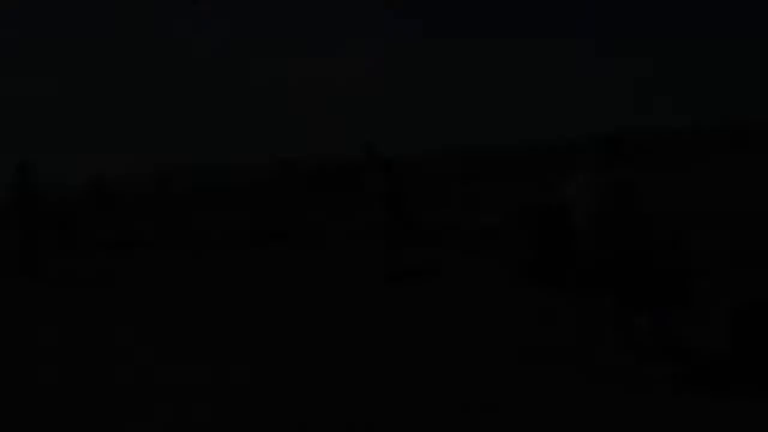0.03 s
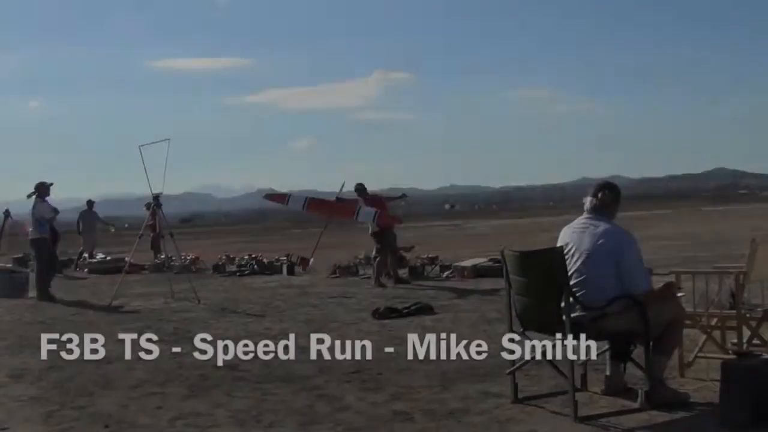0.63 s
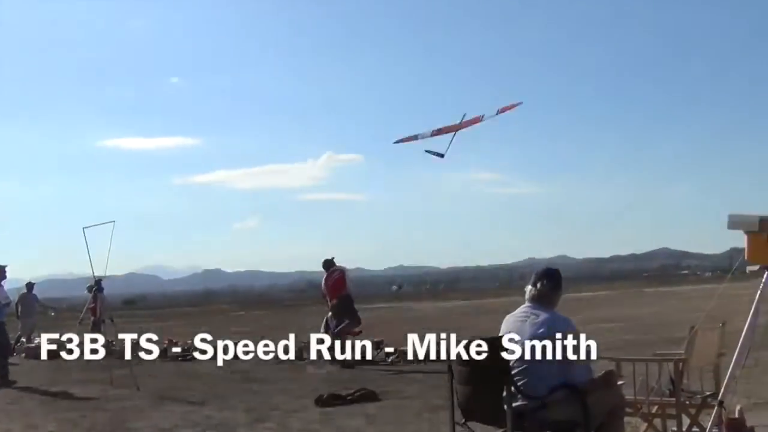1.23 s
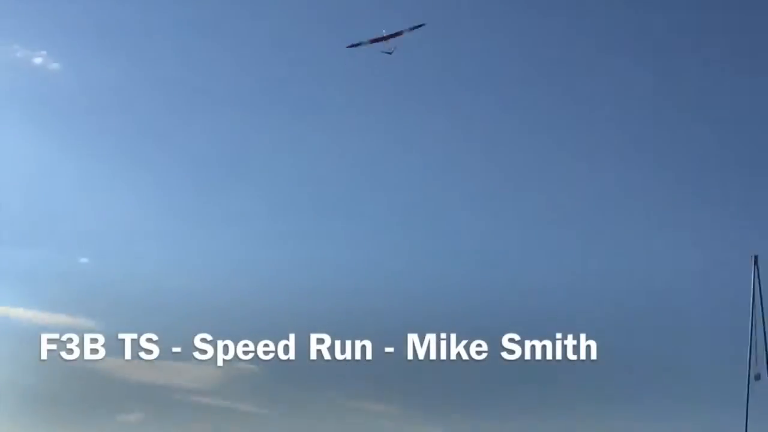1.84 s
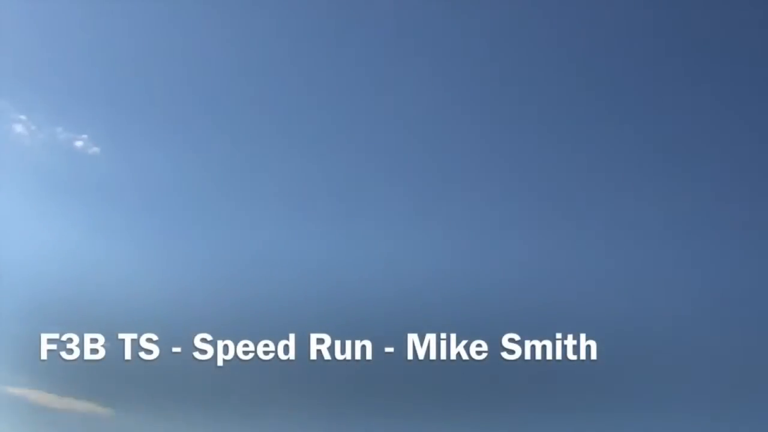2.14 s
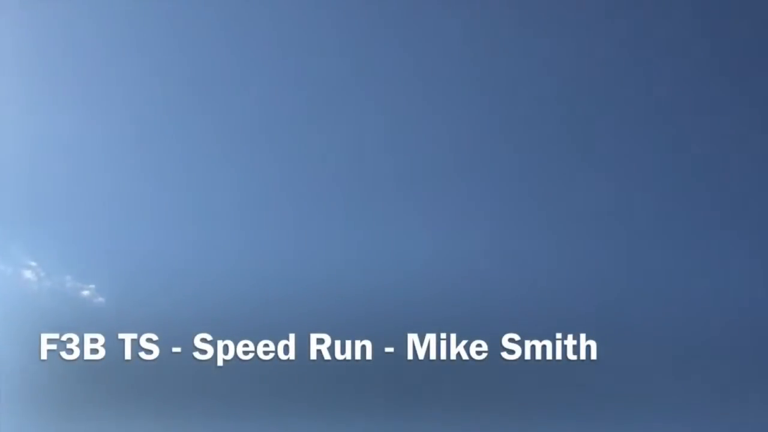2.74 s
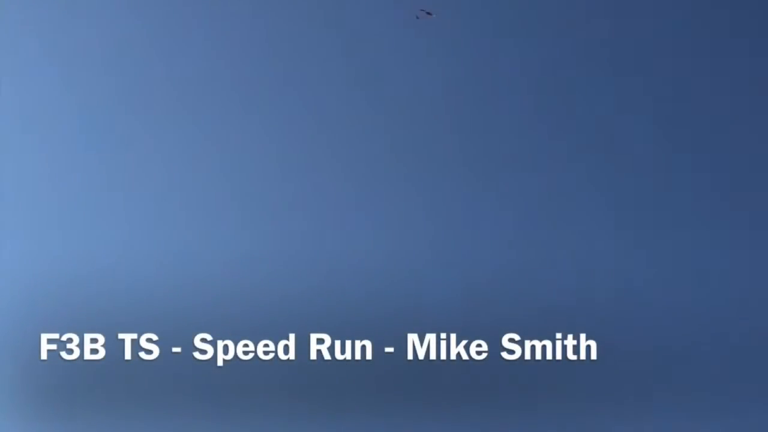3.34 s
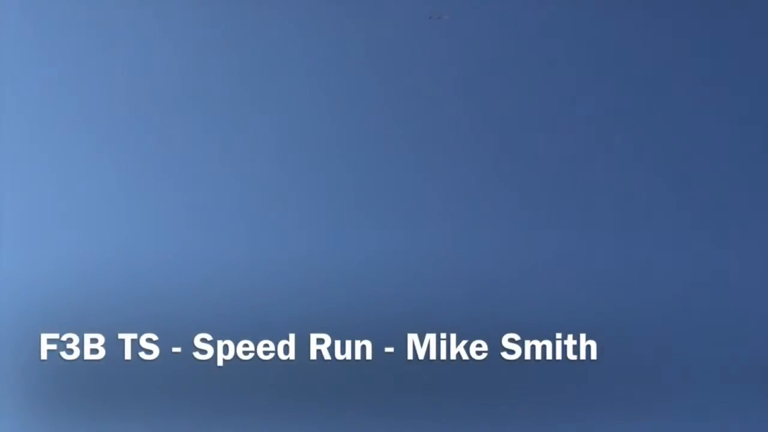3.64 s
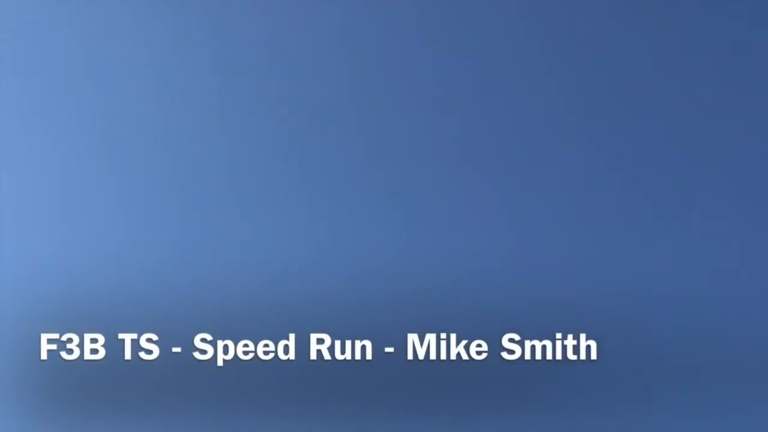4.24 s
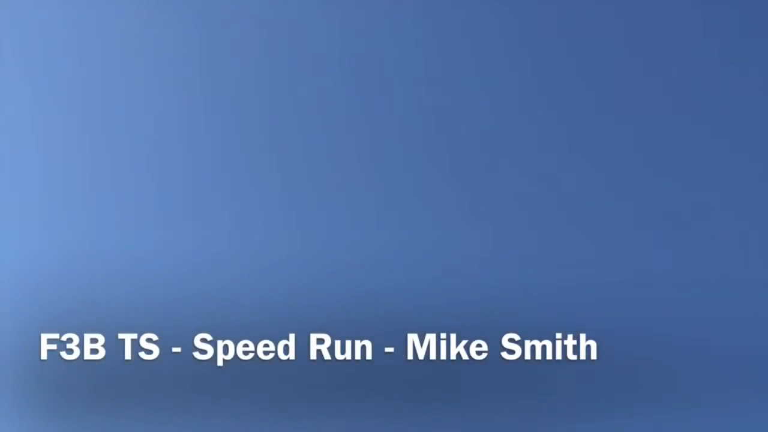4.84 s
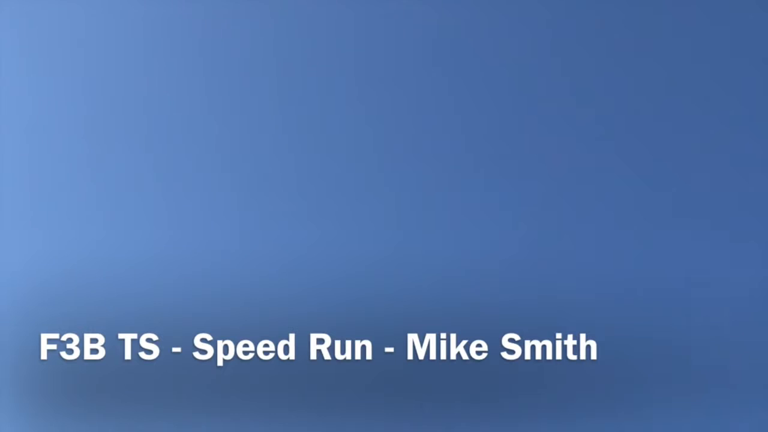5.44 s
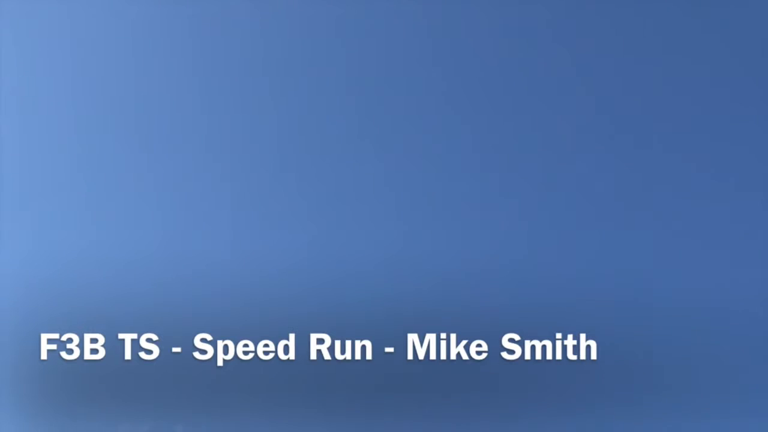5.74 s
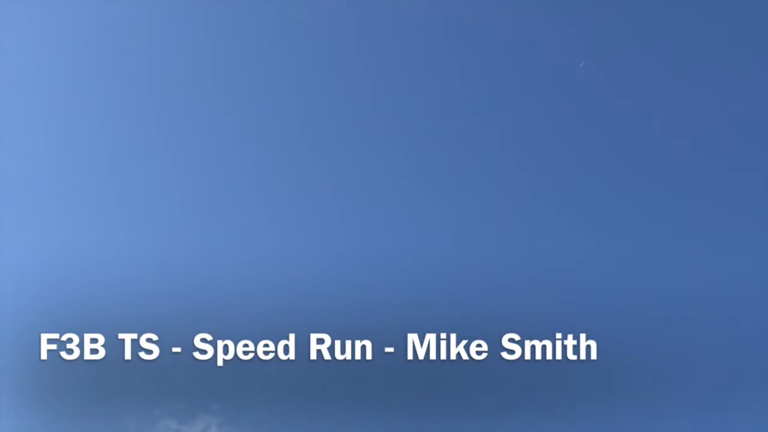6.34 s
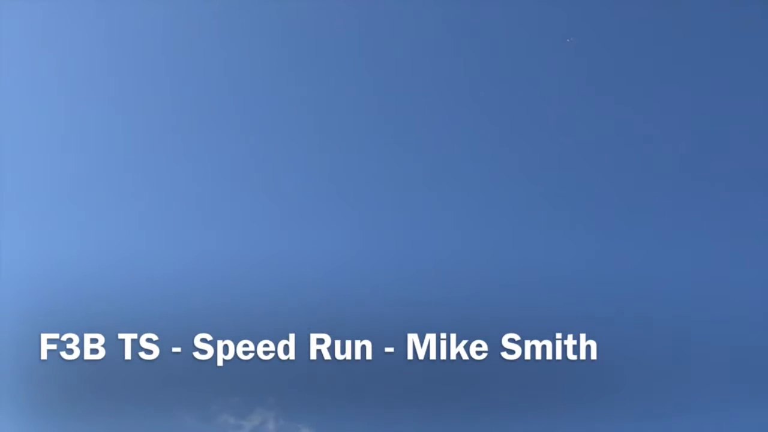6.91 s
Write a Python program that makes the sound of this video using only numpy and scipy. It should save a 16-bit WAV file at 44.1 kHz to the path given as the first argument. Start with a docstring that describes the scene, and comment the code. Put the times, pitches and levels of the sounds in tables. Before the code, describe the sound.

In an open field, a fast model glider approaches from the right with a breathy whistle and a swelling rush of air. It passes close to the microphone with a loud whoosh, the whistle dropping in pitch and vanishing. A rumbling wake and an airy hiss trail away to the left, fading slowly. A light wind rumbles softly on the microphone underneath.

```python
"""Fly-by of a model glider

A fast model glider dives from right to left past an ear-like pair of microphones in an open field.
Breathy edge tones lead it and fall in pitch by the Doppler effect. Turbulence makes the rush of the
wings and the rumble of the wake, which lingers long after the pass. Reflections comb the sound;
a light wind and a faint hiss lie underneath."""
import sys
import numpy as np
from scipy import signal
from scipy.io import wavfile
from scipy.ndimage import map_coordinates

SR = 44100
rng = np.random.default_rng(int(sys.argv[2]) if len(sys.argv) > 2 else 0)


def waveform_to_disk(signal):
    """Save audio, clipped to [-1, 1], as 16-bit WAV at the path in sys.argv[1]."""
    frames = np.transpose(np.atleast_2d(signal))
    scaled = np.clip(frames, -1, 1) * 32767
    samples = np.round(scaled).astype(np.int16)
    wavfile.write(sys.argv[1], SR, samples)


N = 316197
TIME = np.arange(N) / SR
FRAME, HOP = 1024, 256  # samples


def glider(hz, t, base_lags_ms=(.66, .75), shadow_powers=(2.2, 1.1), scatter_hz=3000, close_hz=2200):
    """Binaural hearing: sound reaches the far microphone later, shadowed and partly scattered."""
    # Surges and lulls of the glider's sound. Each row: centre time and length in seconds, gain in dB,
    # centre frequency in Hz, width in octaves, glide in octaves per second.
    flares = [(1.04, 0.082, 7, 4150, 0.5, 0.53), (1.208, 0.059, 7.5, 4630, 0.56, 0.23),
              (1.284, 0.15, 4.5, 1330, .2, 0.0056), (1.551, 0.01, 14, 4170, 0.46, 0),
              (1.619, 0.0086, 14.5, 5000, 0.69, 0.32), (1.695, 0.0179, 8, 8000, 0.64, 0.37),
              (1.725, 0.06, -3.5, 3005, .45, 0.11), (1.798, .012, 6.5, 5155, 0.34, 0),
              (1.865, 0.032, 9, 290, 0.59, 0.11), (1.904, .025, 3.5, 1662, 0.44, 0.25),
              (1.97, 0.11, 5, 9840, 0.35, 0.12), (2.01, .07, 5.5, 769, 0.36, 0),
              (2.03, 0.12, -4, 3600, 0.37, 1), (2.17, 0.045, 3.5, 320, 0.42, 0),
              (2.35, .08, -8.5, 641, .3, 0), (2.5, 0.11, -4, 8900, 0.33, 0),
              (2.667, .04, 3.5, 4000, 1.9, 0), (2.953, 0.09, 4.5, 4830, 1.9, 0.094),
              (3.6, 0.46, 4.5, 4720, 0.78, 0.069), (4.427, 0.21, 6, 3194, 0.42, 0.27),
              (5.649, 0.45, 7, 1267, 0.17, 0)]
    # Acoustic shadow on the far side. Each row: frequency in Hz, left and right gain in dB.
    shadow = [(60.9, 3, -2), (211.9, -2, -1), (315.5, 6, 1), (353, 1, -4), (458.5, -2, -4.5),
              (570, -3.5, -7.5), (669, -9.5, -1.5), (800, -10.5, -2.5), (1154, -3.5, -5.5),
              (1500, -18, -9.5), (1903, -11, -10.5), (2290, -11.5, -16.5), (3500, -13.5, -20),
              (5500, -10.5, -11.5), (10076, -17, -20), (14800, -10.5, -27)]
    # Brief brightness on the right as the glider leaves. The columns are those of flares.
    right_lift = [(2.3, .3, 7, 3107, .7, .2)]
    bearing = flight_path(t)[0]
    flare = undb(surges(flares, hz, t))
    rush = air_rush(hz, t) * flare * ground_comb(hz, t)
    direct = rush * noise() + flare * edge_tones()
    scattered = .75 * hz ** 3 / (hz ** 3 + scatter_hz ** 3)
    # close by, the wing spans a wide angle, so the two sides hear different treble noise
    spread = .95 * (1 - bearing ** 2) * hz ** 3 / (hz ** 3 + close_hz ** 3)
    # long waves take a wider way round to the far side
    detour = 1 + .2 / (1 + (hz / 250) ** 2)
    ears = []
    sides = zip((-1, 1), base_lags_ms, spectrum(shadow, hz), shadow_powers, near_comb(hz, t))
    for side, lag_ms, shadow_db, power, comb in sides:  # left, then right
        away = np.maximum(side * bearing, 0)
        incoherent = np.clip(np.maximum(scattered * away, spread * (side < 0)), 0, 1)
        heard = np.sqrt(1 - incoherent) * direct + np.sqrt(incoherent) * rush * noise()
        shade = undb(away ** power * shadow_db)
        ears.append(heard * comb * shade * delay(hz, away * lag_ms * detour))
    left, right = ears
    return join(np.array([left, right * undb(surges(right_lift, hz, t))]))


def air_rush(hz, t, crossover_hz=527, flutter_db=1, twinkle_db=2.5):
    """Turbulence noise, as a gain: large wake eddies make the bass, the thin boundary layer the treble."""
    # Spectra radiated forward and backward. Each row: frequency in Hz before the Doppler shift, gain in dB.
    ahead = [(30, -8), (120, 3.5), (245, -3), (340, -11.5), (500, -6.5), (700, -5), (950, -1.5), (1300, -1),
             (1680, -7), (2200, -5.5), (2600, -6.5), (3000, -5.5), (3330, -1.5), (3800, -12.5), (4500, -11),
             (5500, -17.5), (7700, -16), (8800, -22.5), (11000, -30.5)]
    behind = [(35, -22.5), (110, 3), (250, 0), (400, -4), (650, -2), (860, -5.5), (1080, -1), (1350, -4),
              (1600, 0), (1880, -2), (2300, -1.5), (2950, -5.5), (3900, -4), (5200, -7.5), (6700, -9.5),
              (7800, -15), (12500, -11.5), (20000, -11)]
    bearing, doppler, _ = flight_path(t)
    wake_share = 1 / (1 + (hz / crossover_hz) ** 2.7)
    db = wake_share * wake_level(t) + (1 - wake_share) * wing_level(t) - air_absorption(hz, t)
    # the forward beam gives way to the broad roar as the nose goes by
    passed = .5 + .5 * np.tanh((bearing + .1) / .39)
    db += (1 - passed) * spectrum(ahead, hz / doppler)[0] + passed * spectrum(behind, hz / doppler)[0]
    # the flow flutters, and moving air on the way makes the upper bands twinkle
    flutter = flutter_db * wander(28.39, t)
    twinkle = twinkle_db * eddies(hz, t, rate=12, per_octave=1.8)
    return undb(db + (1 - wake_share) * (flutter + twinkle))


def wing_level(t, near_db=-52):
    """Boundary-layer noise in dB: it falls with distance, faster ahead than behind, and swells and dips."""
    # Swells and dips. Each row: centre time and length in seconds, gain in dB.
    swells = [(0.876, 0.16, 4), (1.503, 0.055, -5), (1.593, 0.2, 6), (1.857, 0.027, -5), (2.059, 0.11, 5),
              (2.424, 0.15, 3.5), (3.413, 0.18, 5.5), (4.057, 0.17, 3.5), (4.495, 0.35, 6.5),
              (5.496, 0.52, 8), (6.689, 0.53, 8)]
    bearing, _, distance = flight_path(t)
    db_per_decade = np.where(bearing < 0, 63.5, 50)
    swell_db = sum(db * np.exp(-((t - s) / length) ** 2) for s, length, db in swells)
    return near_db - db_per_decade * decades(distance, near=1.68) + swell_db


def wake_level(t, peak_s=2.08, peak_db=-39.5, rise_db_per_s=29.5, linger_s=1.537, db_per_decade=44.5):
    """Wake turbulence in dB: it builds until just after the pass, then decays by a power law."""
    age = t - peak_s
    decay_db = db_per_decade * np.log10(1 + np.maximum(age, 0) / linger_s)
    return peak_db + rise_db_per_s * np.minimum(age, 0) - decay_db


def edge_tones(off_beam_db_per_degree=1.4):
    """Edge tones from gaps in the airframe fall by the Doppler effect and fade as their beams turn away."""
    # Each row: frequency in Hz before the Doppler shift, width in Hz, steady share of the power.
    # The wide rows are the airy hiss around a tone.
    tones = [(1393, 110, .35), (1400, 700, 0), (3337, 100, .5), (3330, 700, 0), (4520, 200, .25),
             (7725, 150, .3)]
    # One forward beam for each tone. Each row: level in dB, beam edge in degrees past abeam,
    # fall in dB per tenfold distance.
    beams = [(-18.5, 26, 98), (-24.5, 12, 115), (-19.5, -38, 122), (-27.5, -60, 80), (-31, -33, 82),
             (-18.5, -39, 100)]
    t = TIME[flight_path(TIME)[0] < .93]
    bearing, doppler, distance = flight_path(t)
    degrees = np.degrees(np.arcsin(bearing))
    whistle = 0
    for (hz, width, steady), (db, edge, fall_db) in zip(tones, beams):
        off_beam_db = off_beam_db_per_degree * np.maximum(degrees - edge, 0)
        gain = undb(db - fall_db * decades(distance, near=1.32) - off_beam_db)
        # turbulence shakes each tone in strength and phase
        shake = np.sqrt(2 * steady) + np.sqrt(1 - steady) * (wander(width, t) + 1j * wander(width, t))
        phase = 2 * np.pi * np.cumsum(hz * doppler) / SR
        whistle += gain * np.real(shake * np.exp(1j * phase))
    return split(np.pad(whistle, (0, N - len(t))))[2]


def flight_path(t, pass_s=1.879, crossing_s=.194, mach=.296):
    """Retarded time on a straight path gives the bearing's sine (-1 coming), Doppler factor and distance."""
    # lengths are in units of the closest distance, which takes crossing_s to fly
    track = np.sinh(np.linspace(-5, 5, 2001))
    arrival_s = pass_s + crossing_s * (track + mach * (np.hypot(1, track) - 1))
    along = np.interp(t, arrival_s, track)
    distance = np.hypot(1, along)
    return along / distance, 1 / (1 + mach * along / distance), distance


def air_absorption(hz, t, coming_db=1.5, going_db=3):
    """Atmospheric absorption in dB grows as powers of the extra distance and of frequency."""
    bearing, _, distance = flight_path(t)
    return np.where(bearing < 0, coming_db, going_db) * (distance - 1) ** .67 * (hz / 4000) ** 1.403


def near_comb(hz, t, blur_cycles=1.2):
    """Interference with a reflection: the comb sweeps down as the glider nears and up as it leaves."""
    # Each row: time in seconds, lag of the reflection in ms, its left and right strength from 0 to 1.
    reflection = [(1.7, 0.26, 0.12, 0), (1.79, 0.33, 0.3, 0), (1.86, 0.4, 0.2, 0.3), (1.94, .6, 0.2, 0.45),
                  (2.01, 0.42, 0.8, 0.5), (2.06, 0.41, 0.8, 0.4), (2.12, 0.35, 0.33, 0.4),
                  (2.2, 0.28, 0.5, 0.17), (2.3, 0.16, 0.4, 0.5), (2.5, 0.1, 0.25, 0.3)]
    lag_ms, left, right = curves(reflection, t)
    # a rough surface blurs all but the first teeth of the comb
    cycles = hz * lag_ms / 1000
    strength = np.array([left, right])[:, None] / (1 + (cycles / blur_cycles) ** 4)
    return (1 + strength * delay(hz, lag_ms)) / np.sqrt(1 + strength ** 2)


def ground_comb(hz, t, blur_cycles=3.6):
    """Ground effect: a reflection combs the departing rush, and rough soil blurs the upper teeth."""
    # Each row: time in seconds, lag of the reflection in ms, its strength from 0 to 1.
    reflection = [(2.4, 1.55, 0), (4.5, 1.66, 0.44), (5.35, 0.82, 0.03), (6.15, 1.4, 0.25), (6.7, 2, 0)]
    lag_ms, strength = curves(reflection, t)
    cycles = hz * lag_ms / 1000
    strength = strength / (1 + (cycles / blur_cycles) ** 4)
    return np.sqrt(1 + 2 * strength * np.cos(2 * np.pi * cycles) / (1 + strength ** 2))


def wind(hz):
    """Pressure fluctuations of a light breeze rumble on each microphone independently."""
    # Each row: frequency in Hz, spectral density in dB per Hz.
    rumble = [(15, -69), (30, -64), (60, -74), (130, -96.5), (300, -106), (700, -130), (2000, -160)]
    return join(np.array([noise() * undb(spectrum(rumble, hz)[0]) for _ in range(2)]))


def hiss():
    """Faint white noise slowly swells and sinks."""
    # Each row: time in seconds, spectral density in dB per Hz.
    levels = [(0, -134), (.6, -127), (3, -120), (4.5, -123), (5.5, -125), (7.1, -129)]
    return rng.standard_normal((2, N)) * np.sqrt(SR / 2) * undb(curves(levels, TIME)[0])


def surges(table, hz, t):
    """Gaussian peaks and dips over time and log frequency, summed in dB."""
    total_db = 0
    for s, length, db, centre, width, glide in table:
        octaves_off = np.log2((hz + 1) / centre) - glide * (t - s)
        total_db += db * np.exp(-((t - s) / length) ** 2 - (octaves_off / width) ** 2)
    return total_db


def eddies(hz, t, rate, per_octave):
    """Scintillation: a random wander over time and pitch, shared by neighbouring frequencies."""
    place = np.broadcast_arrays(np.log2(1 + hz / 100) * per_octave, t * rate)
    return map_coordinates(rng.standard_normal((2 ** 6, 2 ** 9)), place, order=1, mode="wrap")


def wander(rate, t):
    """Smooth random modulation of spread near 1, through rate new values a second."""
    return map_coordinates(rng.standard_normal(2 ** 13), [t * rate], order=3, mode="wrap")


def noise():
    """Short-time spectra of white noise at 0 dB per Hz."""
    return split(rng.standard_normal(N) * np.sqrt(SR / 2))[2]


def delay(hz, lag_ms):
    """A delay turns the phase in proportion to frequency."""
    return np.exp(-2j * np.pi * hz * lag_ms / 1000)


def decades(distance, near):
    """Tenfold steps of distance beyond near, with a soft knee."""
    return np.log10(1 + (distance / near) ** 10) / 10


def undb(db):
    """Decibels to amplitude gain."""
    return 10 ** (np.asarray(db) / 20)


def curves(table, t):
    """A table's columns, interpolated linearly in time."""
    times, *columns = np.transpose(table)
    return [np.interp(t, times, column) for column in columns]


def spectrum(table, hz):
    """A table's columns, interpolated in log frequency."""
    points, *columns = np.transpose(table)
    return [np.interp(np.log(hz + 1), np.log(points), column) for column in columns]


def split(sound):
    """Short-time Fourier transform: frequencies in Hz, times in seconds, spectra."""
    return signal.stft(sound, SR, nperseg=FRAME, noverlap=FRAME - HOP)


def join(spectra):
    """Overlap-add turns short-time spectra back into sound."""
    return signal.istft(spectra, SR, nperseg=FRAME, noverlap=FRAME - HOP)[1][..., :N]


def scene(onset_s=.169, fade_s=.006):
    """Superposition: after a moment of hiss alone, the glider and the wind come in."""
    hz, t, _ = split(np.zeros(N))
    hz = hz[:, None]
    fade_in = np.clip((TIME - onset_s) / fade_s, 0, 1)
    return fade_in * (glider(hz, t) + wind(hz)) + hiss()


def record(dry, low_hz=16, top_hz=15800):
    """Band limiting removes the deepest rumble and the top; between the filters, peaks stop at full scale."""
    highpass = signal.butter(2, low_hz, "highpass", fs=SR, output="sos")
    lowpass = signal.ellip(10, .1, 80, top_hz, fs=SR, output="sos")
    limited = np.clip(signal.sosfilt(highpass, dry), -1, 1)
    return signal.sosfilt(lowpass, limited)


dry = scene()
out = record(dry)
waveform_to_disk(out)
```